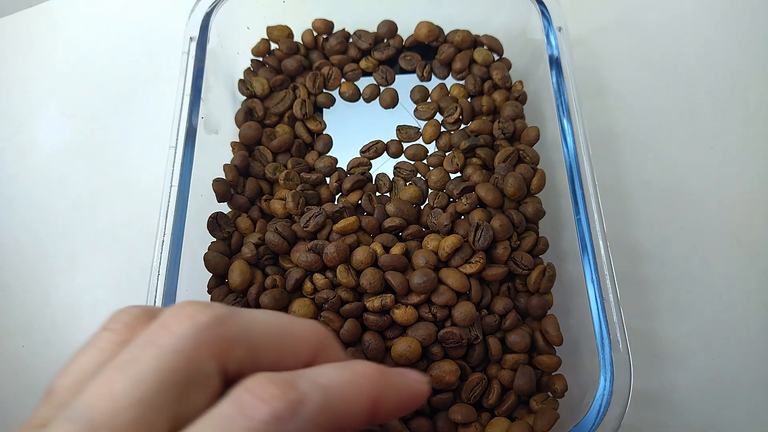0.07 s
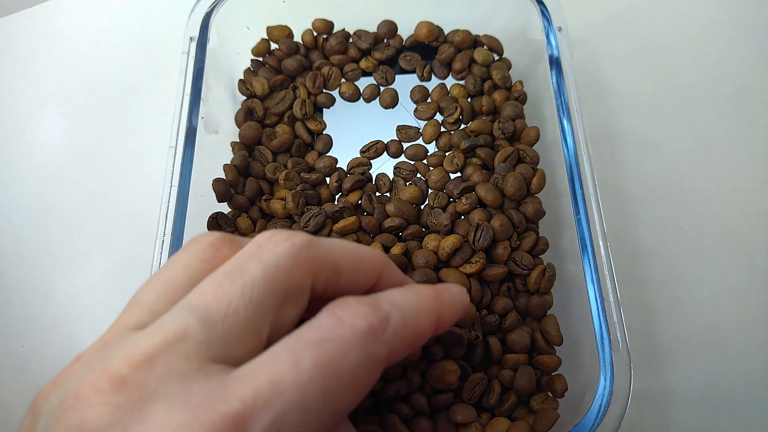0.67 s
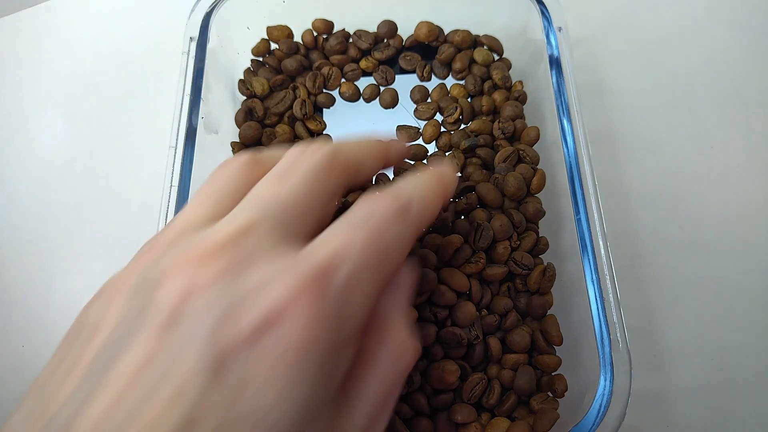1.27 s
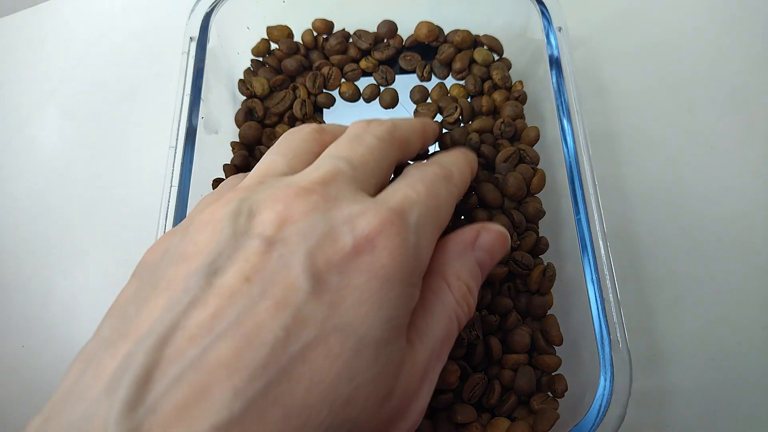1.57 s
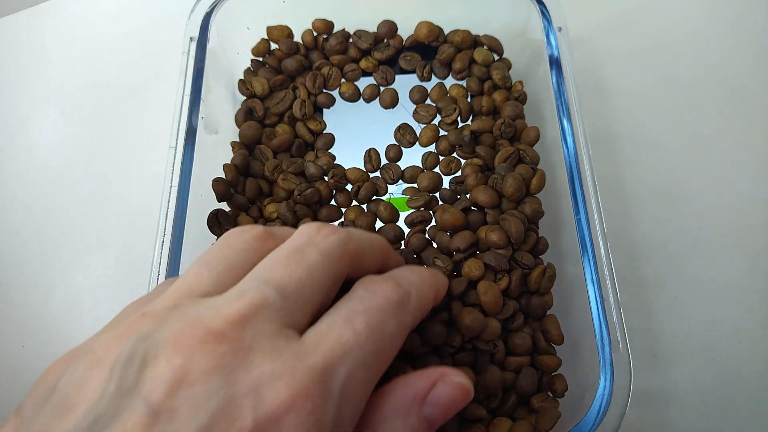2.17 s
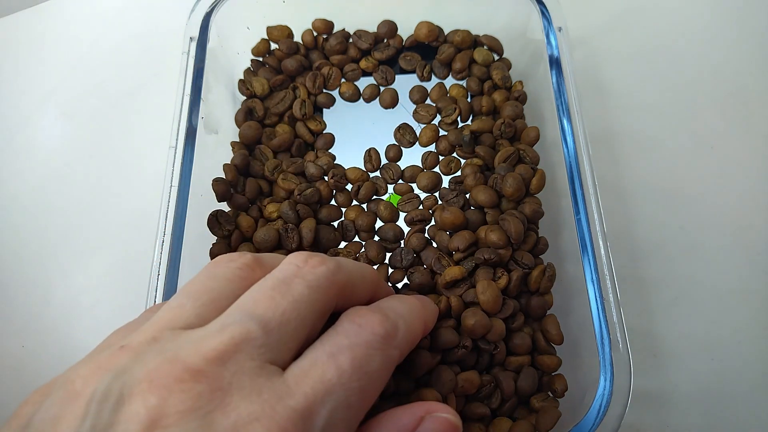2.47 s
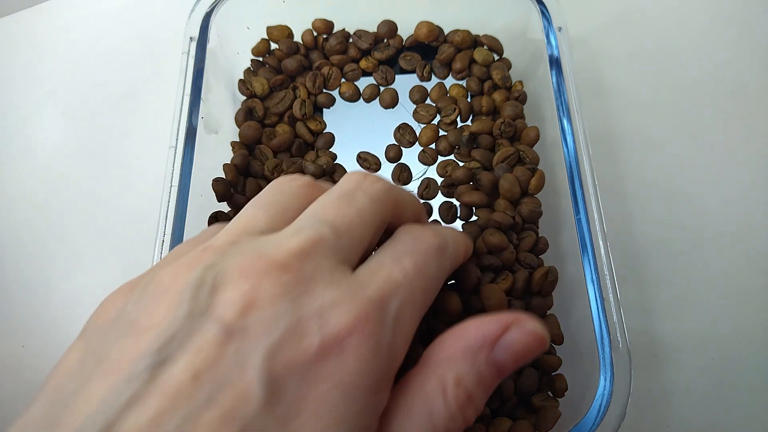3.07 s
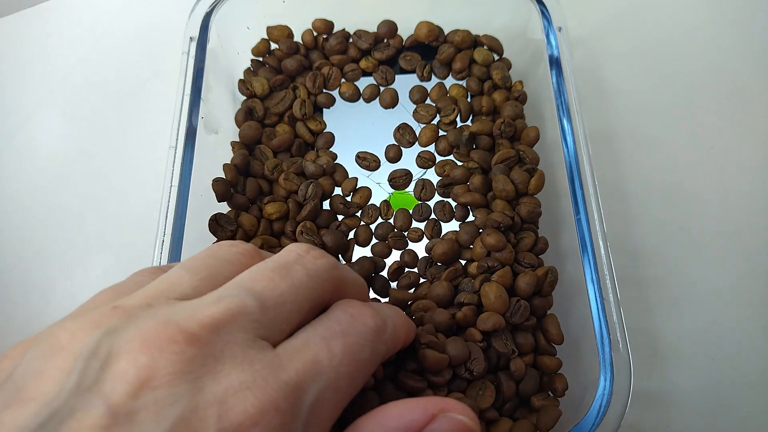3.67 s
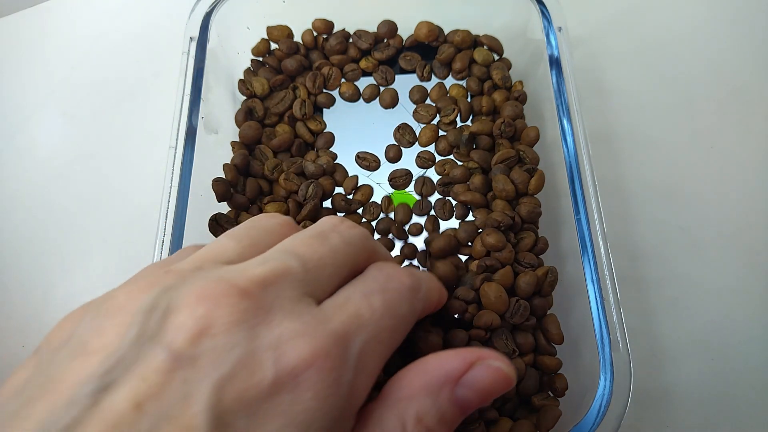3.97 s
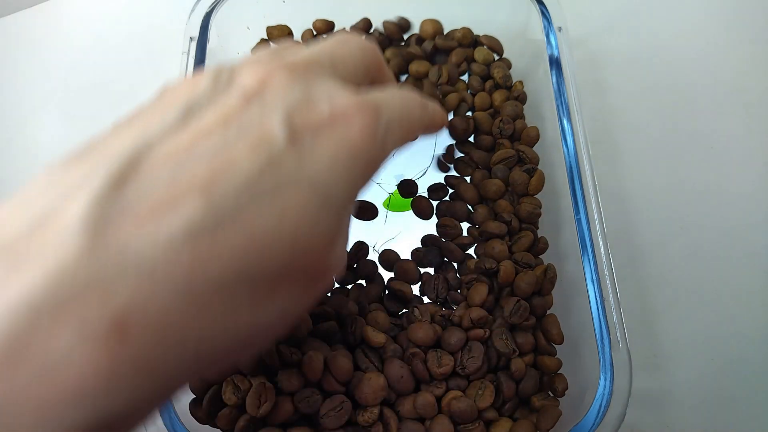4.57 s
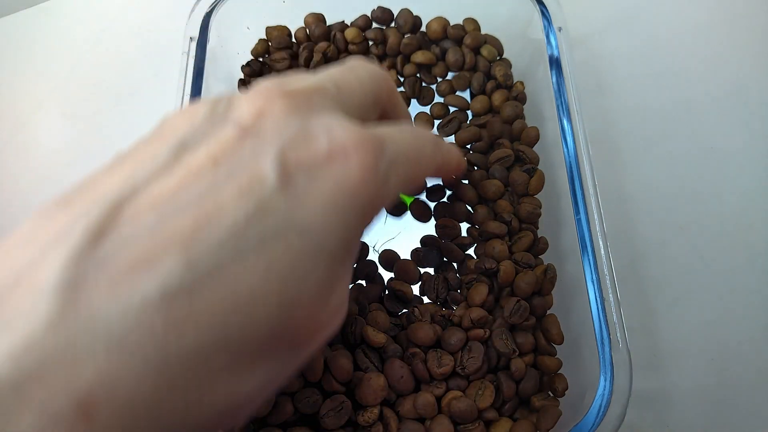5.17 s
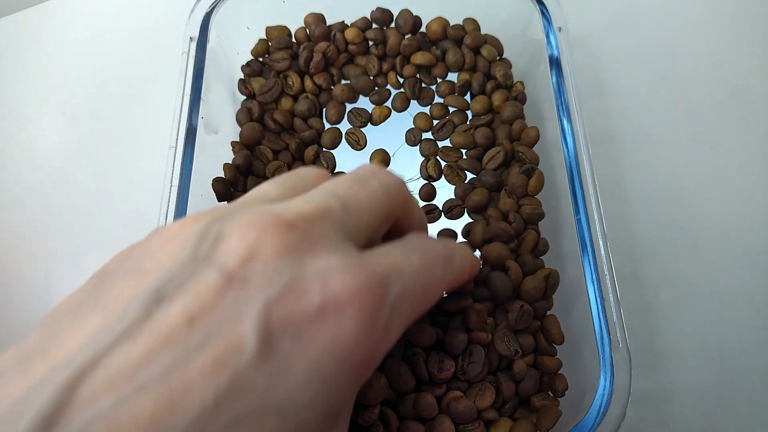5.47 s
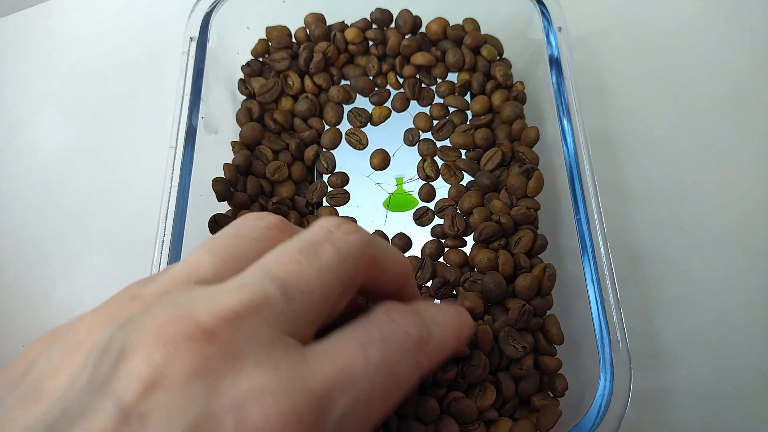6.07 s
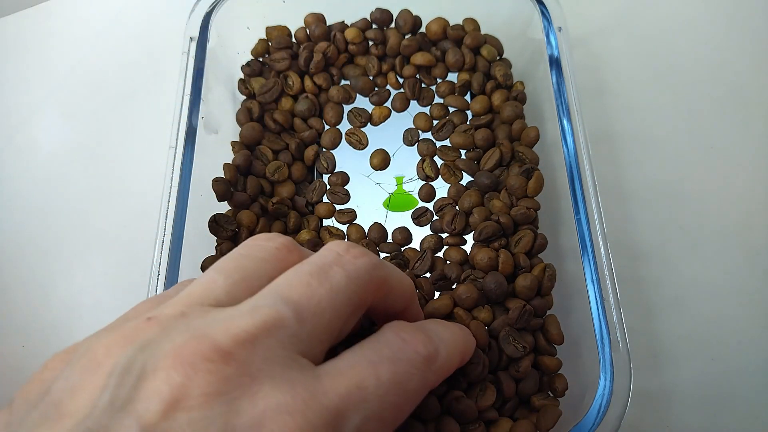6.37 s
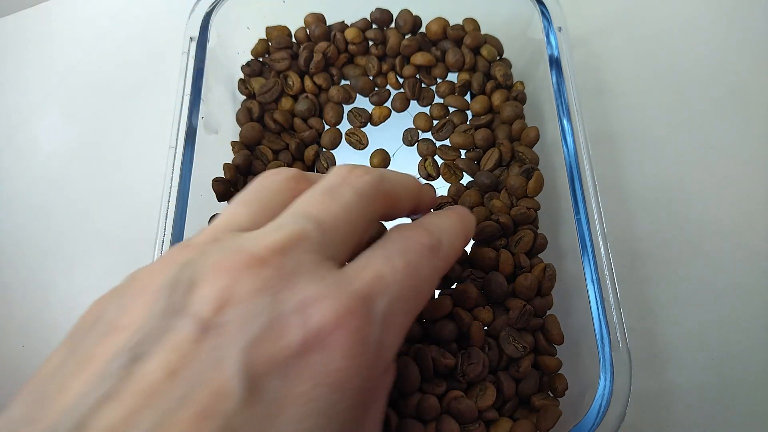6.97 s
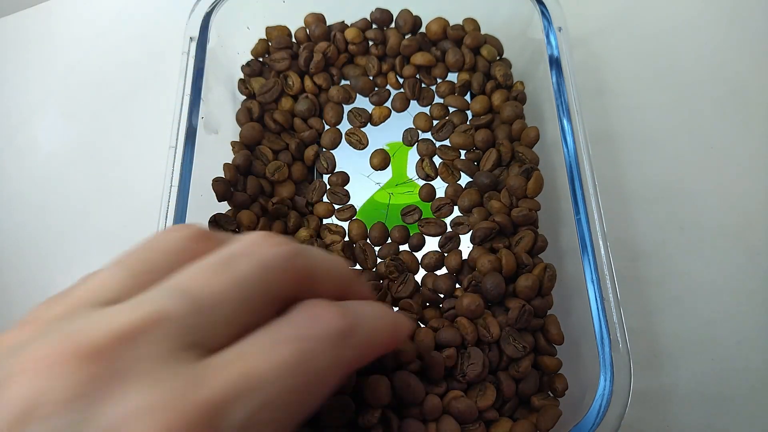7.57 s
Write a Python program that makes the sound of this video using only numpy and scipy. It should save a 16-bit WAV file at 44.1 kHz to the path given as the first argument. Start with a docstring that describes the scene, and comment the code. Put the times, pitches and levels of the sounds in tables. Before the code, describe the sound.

A hand stirs dry coffee beans in a shallow glass dish on a table, close by in a small room with a faint low hum. The first second is almost still, with only a light fingertip brush and a soft, dull bump. From about 1.4 seconds, the beans rustle and rattle in short, uneven pushes. Single beans knock and tick against the glass, husks give tiny crisp snaps, and the table rumbles faintly underneath. A stronger push comes near 2.8 seconds. The densest, loudest raking runs from about 3.7 to 5.3 seconds, with a sharp clack near 4.9. The movement then eases into lighter rustles and scattered clicks, falling nearly quiet around 6.5 seconds. A final push from about 6.9 to 7.5 seconds brings a bright clatter and brittle scraping. A few soft, dull taps follow just before 8 seconds.

```python
"""A small, faintly humming room, where a hand rakes dry roasted coffee beans back and forth in a shallow
glass dish on a table, close by. Countless small impacts add up to a gritty rustle, coloured by the
resonances of the glass, and friction on the bottom drives a rumble in the table. Single beans knock
and tick against the dish, brittle husks snap free, and fingertips brush the resting heap."""
import sys
import numpy as np
from scipy import signal
from scipy.fft import rfft, irfft
from scipy.io import wavfile
from scipy.ndimage import uniform_filter1d

SR = 44100
rng = np.random.default_rng(int(sys.argv[2]) if len(sys.argv) > 2 else 0)


def store_pcm(level_fs):
    """Save levels as 16-bit WAV."""
    pcm = np.round(np.clip(level_fs, -1, 1) * 32767).astype(np.int16)
    wavfile.write(sys.argv[1], SR, np.atleast_2d(pcm).T)


N = 344862
TAPS, LEAD = 2048, 128  # samples in an impulse response, and ahead of a contact's blow
TIME = np.arange(N) / SR
FREQS = np.arange(TAPS // 2 + 1) * SR / TAPS

# pushes of the fingers through the heap:
# (start [s], length [s], rustle level [dB], husk scrape over that level [dB], relative rumble [dB])
PUSHES = [(1.351, 0.12, -60, -3, -64), (1.448, 0.044, -53.5, 2.5, -57), (1.526, 0.036, -53, 2, -59),
          (1.563, 0.038, -51.5, 5, -53.5), (1.64, 0.23, -55.5, 1.5, -57), (1.808, 0.24, -54, -2, -53),
          (2.084, 0.14, -56.5, -1.5, -56.5), (2.378, 0.064, -52.5, 6, -56), (2.487, 0.1, -57, 3, -58.5),
          (2.716, 0.27, -47, 4, -54.5), (2.932, 0.22, -54, 1, -51.5), (3.11, 0.16, -55, 1.5, -55),
          (3.338, 0.032, -50.5, 0, -57), (3.439, 0.026, -51.5, 6, -52.5), (3.591, 0.04, -52.5, 2, -55.5),
          (3.743, 0.25, -48.5, 2.5, -53), (3.873, 0.11, -43.5, 1.5, -57), (4.026, 0.15, -46.5, 0.5, -54.5),
          (4.237, 0.15, -49, 1, -55), (4.353, 0.22, -47.5, 2.5, -54), (4.634, 0.14, -51, 3, -57),
          (4.805, 0.13, -47, 3.5, -56.5), (4.966, 0.17, -48.5, 2, -55), (5.161, 0.14, -49, 2.5, -57.5),
          (5.314, 0.21, -56.5, -1, -53.5), (5.75, 0.13, -57.5, 2, -58), (5.974, 0.14, -55, 1.5, -59),
          (6.194, 0.28, -72, -5, -67.5), (6.892, 0.19, -59, -5.5, -64.5), (7.033, 0.17, -53, -0.5, -59.5),
          (7.157, 0.23, -61, 7.5, -58.5)]


def undb(db):
    """Decibels to amplitude ratio."""
    return 10 ** (np.asarray(db) / 20)


def unit(x):
    """Normalisation to rms 1."""
    return x / np.sqrt(np.mean(x ** 2))


def fade(t, t60):
    """Exponential decay, 60 dB in t60 seconds."""
    return np.exp(-np.log(1000) * t / t60)


def contour(points):
    """Spectrum interpolated over log frequency from (frequency [Hz], level [dB]) points."""
    hz, db = np.transpose(points)
    return np.interp(np.log(FREQS + 1), np.log(hz), db)


def response(db):
    """Minimum-phase impulse response with the given gain at every frequency."""
    cepstrum = irfft(np.log(undb(db)))
    cepstrum[1:TAPS // 2] *= 2
    cepstrum[TAPS // 2 + 1:] = 0
    return irfft(np.exp(rfft(cepstrum)))


def convolve(x, h):
    """Convolution with an impulse response, cut to the input's length."""
    return signal.oaconvolve(np.atleast_2d(x), np.atleast_2d(h), axes=-1)[:, :np.shape(x)[-1]]


def band(x, hz, kind, order=3):
    """Maximally flat filter."""
    return signal.sosfilt(signal.butter(order, hz, kind, fs=SR, output="sos"), x)


def resonate(x, hz, width_hz):
    """Second-order resonance, gain 1 at its centre."""
    return signal.lfilter(*signal.iirpeak(min(hz, SR / 2 - 1000), hz / width_hz, fs=SR), x)


def wander(rate_hz):
    """Slow random modulation with a spread near 1."""
    knots = rng.standard_normal(int(N / SR * rate_hz) + 2)
    return np.interp(TIME * rate_hz, np.arange(len(knots)), knots)


def add(out, s, sound):
    """Superpose a contact so that its blow lands at time s."""
    start = max(int(s * SR) - LEAD, 0)
    out[:, start:start + TAPS] += sound[:, :N - start]


def blow_level(x, db):
    """Set the rms level of a blow over its first 6 ms."""
    return undb(db) * x / np.std(x[:, LEAD - 20:LEAD + 245])


def background(air_db=-66.0, side_db=-7, hum_hz=91.6, hum_db=-74.5, upper_hz=138.4):
    """Ambient noise, most coherent between the sides in the bass, and two phase-modulated hum tones."""
    # spectrum of the room's still air: (frequency [Hz], relative density [dB])
    air_spectrum = [(20, -43), (45, -16), (75, -12.5), (100, -1.5), (150, -2.5), (220, -7.5), (350, -7),
                    (520, -13), (1000, -18.5), (2300, -24), (4500, -29), (7500, -38), (11000, -36.5),
                    (12500, -32.5), (16000, -33.5)]
    # swells of the upper hum: (time [s], level [dB])
    upper_swells = [(.3, -79), (.45, -67.5), (.9, -75.5), (1.2, -74.5), (5.3, -73.5), (6.8, -79.5),
                    (7.7, -71.5)]
    mid, side = rng.standard_normal((2, N))
    side = undb(side_db) * side + .5 * band(side, 700, "high", order=1)
    air = unit(convolve(mid + side * np.array([[1], [-1]]), response(contour(air_spectrum))))
    tones = [(hum_hz, hum_db), (upper_hz, np.interp(TIME, *np.transpose(upper_swells)))]
    hum = sum(undb(db) * unit(np.sin(2 * np.pi * hz * TIME + 0.51 * wander(12))) for hz, db in tones)
    return undb(air_db) * air + hum


def contact(uneven_db, slip=0.27, scatter=.14, echo=0.58, echo_s=.0011):
    """Impulse response of one bean's impact: direct, reflected and scattered waves, and glass modes."""
    # broad spectrum of an impact: (frequency [Hz], relative level [dB])
    bean_spectrum = [(100, -50), (400, -24), (680, -18), (800, -7), (930, -2.5), (1100, 0), (1400, -1),
                     (1570, -3), (1850, -1.3), (3000, -3.5), (4600, -5.8), (5700, -8.3), (7200, -9),
                     (8300, -6), (9400, -4.3), (11200, -6.8), (12200, -3.2), (13700, -6.8), (15500, -7.3)]
    # modes of the dish: (frequency [Hz], bandwidth [Hz], gain over the broad spectrum [dB])
    glass_modes = [(1043, 50, 0.5), (1230, 34, -1), (1298, 27, 2), (1425, 110, 4.5), (1600, 120, -2),
                   (1728, 140, 4), (2420, 79, 3), (2830, 160, 2.5), (3130, 180, 0.5), (6580, 210, 3)]
    t = (np.arange(TAPS) - LEAD) / SR
    # rough shells grate for an instant before they catch; then the sound scatters among beans and walls
    grate = slip * np.exp(np.minimum(t, 0) / rng.uniform(.0003, .0014))
    paths = rng.standard_normal((2, TAPS)) * np.where(t < 0, grate, scatter * fade(np.abs(t), t60=.021))
    paths += band(paths[::-1] - paths, 2400, "low", order=1) / 2  # long waves reach both sides alike
    right_delay = rng.integers(3, 6)  # the left side is nearer
    bounce = int(SR * echo_s * rng.uniform(.7, 1.2))  # off the hand or the far wall
    for channel, lag in enumerate((LEAD, LEAD + right_delay)):
        paths[channel, lag] += 1
        paths[channel, lag + bounce + channel * rng.integers(0, 10)] += echo
    paths[1] -= 2 * resonate(paths[1], hz=1580, width_hz=400)  # bending mode: walls swing in antiphase
    glass_db = sum(db / (1 + (2 * (FREQS - hz) / width) ** 2) for hz, width, db in glass_modes)
    bumps = rng.standard_normal(26)  # every bean has its own broad resonances, mostly in the treble
    own_db = np.interp(FREQS, np.linspace(0, SR / 2, len(bumps)), bumps)
    own_db *= uneven_db * FREQS / (FREQS + 1200)
    colour = response(contour(bean_spectrum) + glass_db + own_db)
    pan_db = 2.0 + 1.3 * rng.standard_normal()
    return unit(convolve(paths, colour)) * undb([[pan_db / 2], [-pan_db / 2]])


def tick(blow, hz, width_hz):
    """Heavily damped resonance of one bean's shell, with little below its pitch."""
    return resonate(band(blow, 0.45 * hz, "high", order=5), hz, width_hz)


def snaps(ring_db=3, body_db=-21):
    """Sudden release: a husk snaps free, rings briefly at one pitch and barely stirs the dish."""
    # brittle husks slipping past each other: (time [s], level [dB], pitch [Hz], bandwidth [Hz])
    releases = [(0.619,-76,11000,5000), (1.436,-48.5,10700,2500), (1.487,-46,11700,3000),
                (1.764,-47,10200,1500), (1.795,-49,14500,3000), (1.978,-50,14500,4000),
                (2.061,-42,15150,2000), (2.102,-43,10500,4000), (2.111,-47,13000,9000),
                (2.399,-48,12300,3000), (2.406,-44,12300,3000), (2.42,-47,13000,4000),
                (2.515,-34,14900,2200), (2.736,-48,11200,3000), (2.866,-43,12800,1200),
                (2.917,-41,11900,3020), (2.935,-39,9800,1210), (3.136,-37,12500,1500),
                (3.144,-41,12600,1500), (3.179,-38.5,13050,1300), (3.458,-42,11750,2000),
                (3.475,-40,11900,3000), (3.644,-44.5,11700,3000), (4.121,-40.5,12500,1200),
                (4.331,-38,12700,2500), (4.426,-30,12800,3500), (4.428,-33,12700,1200),
                (4.531,-31.5,10100,4000), (4.531,-30.5,13600,4000), (5.871,-49,12500,4000),
                (5.939,-43.5,13500,6000), (5.952,-47.5,12500,4000), (6.079,-49,13500,3000),
                (6.094,-41,12600,2000), (6.993,-48,12000,1190), (7.064,-41,9400,3500),
                (7.249,-46,12500,3000), (7.254,-40,12500,3000), (7.324,-46,10000,2000),
                (7.362,-48,13800,5000), (7.393,-48,13000,1800), (7.406,-45,11400,3000),
                (7.413,-44.5,11900,3000), (7.45,-50,13400,5000), (7.456,-40,13100,2000),
                (7.653,-53.5,10200,5000)]
    out = np.zeros((2, N))
    for s, db, hz, width_hz in releases:
        blow = contact(uneven_db=3, slip=0, scatter=.22) * fade(TIME[:TAPS], t60=.08)
        shell = tick(blow, hz, width_hz)
        shell += undb(ring_db) * resonate(shell, hz, width_hz=450)
        body = band(blow, 7000, "low")
        add(out, s, blow_level(shell, db) + blow_level(body, db + body_db))
    return out


def brushes(hz=8850, width_hz=1300):
    """Friction noise: a fingertip slides over resting beans with a faint, narrow-band hiss."""
    # light strokes: (start [s], length [s], highest level [dB])
    strokes = [(0.825, 0.12, -75), (6.729, 0.11, -76)]
    gain = sum(undb(db) * np.interp(TIME, [s, s + length / 4, s + length], [0, 1, 0])
               for s, length, db in strokes)
    hiss = resonate(rng.standard_normal((2, N)), hz, width_hz)
    return gain * unit(resonate(hiss, hz, width_hz))


def tocks(rise_cycles=2.1):
    """Damped sinusoids with a rounded onset: dull blips that last longer the lower they are."""
    # soft tocks as the hand arrives and leaves: (time [s], pitch [Hz], peak level [dB])
    blips = [(1.161, 185, -58.5), (7.611, 810, -63.5), (7.723, 850, -54), (7.787, 930, -58)]
    out = np.zeros(N)
    for s, hz, db in blips:
        cycles = hz * np.maximum(TIME - s, 0)
        envelope = cycles / rise_cycles * np.exp(1 - cycles / rise_cycles)
        out += undb(db) * envelope * np.sin(2 * np.pi * cycles)
    return out


def push_envelope(levels_db, attack_s, t60, sag_db_per_s=2):
    """Envelope in dB: each push builds, sags as the beans make way, then decays; the strongest leads."""
    gain = np.full(N, 1e-6)
    for (start, length, *_), db in zip(PUSHES, levels_db):
        span = slice(int(start * SR), int(start * SR) + SR)
        t = TIME[span] - TIME[span][0]
        rise = np.minimum(t / attack_s, 1)
        held = undb(db - sag_db_per_s * np.minimum(t, length))
        settle = fade(np.maximum(t - length, 0), t60)
        gain[span] = np.maximum(gain[span], rise * held * settle)
    return 20 * np.log10(gain)


def jostle(rate, busy, spread_db, uneven_db, spot_count=120):
    """Shot noise: random impacts at many spots; busy (0-1), the share of moving beans, sets the density."""
    spots = [contact(uneven_db) for _ in range(spot_count)]
    chances = rng.random((int(rate * N / SR), 3))
    forces = undb(spread_db * np.minimum(rng.standard_normal(len(chances)), 1.6))
    out = np.zeros((2, N))
    for (when, threshold, spot), force in zip(chances, forces):
        share = busy[int(when * N)]
        if threshold < share:
            add(out, when * N / SR, force / np.sqrt(share) * spots[int(spot * spot_count)])
    return unit(out)


def squeaks(count=450):
    """Stick-slip friction: shells catch on the glass in tiny scratches, each at its own pitch."""
    out = np.zeros((2, N))
    t = TIME[:TAPS]
    envelope = (1 - np.exp(-t / .0004)) * fade(t, t60=.014)
    for when, pitch, force in rng.random((count, 3)):
        scratch = resonate(rng.standard_normal((2, TAPS)), hz=9000 + 5000 * pitch, width_hz=1000)
        add(out, when * N / SR, force * envelope * scratch)
    return unit(out)


def rustle(reach, hollow_near_db=-8, hollow_far_db=-0.5, grit_far_db=-0.5):
    """Incoherent sum of impacts that ring the dish, grate and scrape; a harder push moves more beans."""
    # fine, then coarse contacts:
    # (rate in a firm push [1/s], spread of force [dB], spread of colour [dB], weight [dB])
    kinds = [(3000, 4, 3, -1.8), (300, 3.6, 5, 0)]
    _, _, levels, scrapes, _ = np.transpose(PUSHES)
    push_db = push_envelope(levels, attack_s=0.015, t60=0.36)
    husk_db = push_envelope(levels + scrapes, attack_s=0.015, t60=0.34)
    # at the thinly covered far end the dish rings more and fewer beans rub each other
    hollow_db = push_db + hollow_near_db + reach * (hollow_far_db - hollow_near_db)
    grit_db = push_db + grit_far_db * reach ** 2
    busy = undb((np.clip(grit_db, -62, -44) + 44) / 2)
    grains = sum(undb(db) * jostle(rate, busy, spread, uneven) for rate, spread, uneven, db in kinds)
    hollow = unit(band(grains, 1470, "low", order=5)) * undb(hollow_db)
    grit = unit(band(grains, [1600, 7500], "band", order=5)) * undb(grit_db)
    husks = unit(band(grains, 7900, "high", order=5)) + undb(-9) * squeaks()
    surge = undb(1.1 * wander(40) - .1)  # the heap jams and gives way many times a second
    return surge * (hollow + grit + unit(husks) * undb(husk_db))


def rumble(reach, side_gain=0.66, trim_db=-4.5):
    """Forced vibration: dragged beans shake dish and table; pulls favour upper modes, pushes lower ones."""
    # modes of the loaded dish on the table:
    # (frequency [Hz], bandwidth [Hz], gain [dB], gain added on a pull and lost on a push [dB])
    table_modes = [(223.8, 13.6, 12.5, -0.8), (273, 30, 1, -1), (324.7, 17, 9, 1), (347, 9.9, 2, 1),
                   (430, 1200, -14, 0.5)]
    *_, levels = np.transpose(PUSHES)
    rumble_db = push_envelope(levels, attack_s=0.013, t60=0.73)
    drag = rng.standard_normal(N) + side_gain * rng.standard_normal((2, N))
    pull = uniform_filter1d(-np.sign(np.gradient(reach)), size=SR // 8)  # +1 towards the near end
    shake = sum(undb(db + pull_db * pull) * resonate(drag, hz, width)
                for hz, width, db, pull_db in table_modes)
    return unit(shake) * undb(rumble_db + trim_db)


def clacks(reach, heap_edge_hz=2900, bare_edge_hz=1550, knock_trim_db=-4, crack_trim_db=-5,
           tick_trim_db=-1.5):
    """Impact excitation: a bean knocks the dish, lower on bare glass; its shell cracks, clinks and ticks."""
    # beans striking the glass, levels before trim: (time [s], knock [dB], crack [dB], tick [dB])
    impacts = [(1.366, -60, -57, -58), (1.382, -54, -66, -71), (1.464, -59, -50, -48),
               (1.471, -67, -53, -45), (1.508, -52, -45, -46), (1.585, -49, -46, -44),
               (1.59, -40, -43, -47), (1.675, -50, -45, -47), (1.681, -49, -48, -53),
               (1.747, -47, -47, -53), (1.809, -52, -39, -51), (1.85, -43, -40.5, -48),
               (1.886, -44.5, -40.5, -44.5), (1.921, -49, -45, -54), (1.931, -51, -45, -54),
               (1.988, -40.5, -40.5, -42.5), (2.03, -49, -48, -42.5), (2.136, -44.5, -40.5, -43.5),
               (2.161, -52, -51, -40.5), (2.204, -44.5, -43, -42), (2.22, -53, -56, -46),
               (2.227, -62, -52, -48), (2.391, -57, -51, -59), (2.44, -46.5, -62, -55),
               (2.453, -52, -49, -53), (2.485, -49, -61, -47), (2.49, -43, -44, -48),
               (2.58, -36, -37.5, -39), (2.593, -49, -42.5, -57), (2.679, -46, -56, -52),
               (2.8, -38.5, -34.5, -40), (2.811, -42, -38, -40), (2.914, -41, -46, -46),
               (2.972, -44, -50, -55), (2.987, -43, -50, -39), (3.136, -41, -40, -54),
               (3.175, -44, -47, -52), (3.253, -62, -67, -66), (3.286, -49, -57, -48.5),
               (3.335, -50, -52, -43), (3.352, -50, -42, -49), (3.372, -53, -43, -47),
               (3.39, -42.5, -43, -53), (3.464, -42, -39, -41), (3.497, -39.5, -43.5, -51.5),
               (3.584, -43.5, -45.5, -57), (3.61, -43, -37.5, -46), (3.66, -46.5, -66, -65),
               (3.746, -53, -65, -56), (3.767, -61, -63, -46), (3.808, -49, -48, -46),
               (3.885, -56, -58, -49), (3.912, -50, -47, -46), (3.948, -37, -37.5, -42),
               (3.952, -47, -37, -42), (4.058, -35.5, -37.5, -50), (4.088, -39.5, -45, -43),
               (4.138, -43, -51, -57), (4.147, -40, -50, -37.5), (4.196, -42.5, -42, -43),
               (4.257, -47, -53, -48), (4.269, -48, -43, -55), (4.378, -43, -38.5, -39),
               (4.407, -42, -43, -45), (4.427, -36, -51, -50), (4.45, -42, -52, -39),
               (4.461, -39, -47, -41), (4.474, -51.5, -46.5, -38), (4.487, -35.5, -43, -52),
               (4.513, -42, -57, -52), (4.531, -39, -54, -43), (4.544, -37.5, -58, -47),
               (4.561, -39, -58, -41), (4.583, -39, -59, -58), (4.649, -38, -40, -39),
               (4.653, -43, -38, -38), (4.669, -40, -40.5, -44), (4.821, -46, -41, -41.5),
               (4.845, -65, -54, -44), (4.867, -47, -48, -48), (4.873, -42, -50, -44),
               (4.877, -28.5, -33.5, -36), (4.897, -61, -44, -58), (4.902, -48, -47, -54),
               (4.919, -46, -49, -58), (4.924, -39, -39.5, -58), (4.945, -57.0, -57.5, -44),
               (4.972, -40.5, -38, -50), (5.014, -47, -39.5, -50), (5.065, -47, -59, -45),
               (5.197, -45, -48, -42), (5.212, -58, -47, -49), (5.272, -51, -50, -46),
               (5.314, -50, -59, -53), (5.427, -48, -49, -54), (5.447, -45, -48, -47),
               (5.471, -47, -51, -49), (5.511, -44, -44, -41.5), (5.53, -48, -48, -45),
               (5.541, -44, -44, -39.5), (5.715, -64, -63, -61), (5.767, -61, -65, -66),
               (5.801, -47.5, -48, -55), (5.832, -42.5, -46, -66), (5.997, -67, -51, -46),
               (6.079, -47, -62, -57), (6.093, -46, -48, -48), (6.099, -55, -53, -45),
               (6.105, -42, -44, -36), (6.173, -52.5, -55, -62), (6.325, -53, -56, -51.5),
               (6.371, -59, -62, -59), (6.374, -47.5, -48, -49), (6.394, -47, -42, -51),
               (6.409, -48, -49, -48), (6.442, -49, -51.5, -52.5), (6.932, -55, -69, -73.5),
               (7.12, -33.5, -38, -35), (7.143, -39, -45, -37), (7.158, -48, -52, -43),
               (7.195, -48, -56, -55), (7.301, -49, -46, -57), (7.585, -74, -67, -66)]
    # modes of the bottom: (frequency [Hz], bandwidth [Hz], gain when bare [dB], gain under the heap [dB])
    bottom_modes = [(1080, 550, -1, -13), (1058, 60, 2, -12), (1298, 60, 10.5, -11.5), (1808, 65, -13, 2),
                    (1920, 160, -7.5, 6.5)]
    out = np.zeros((2, N))
    for s, knock_db, crack_db, tick_db in impacts:
        blow = contact(uneven_db=2.0, slip=0)
        tick_hz, clink_hz = 9270 * rng.uniform(.93, 1.27), rng.uniform(3000, 6800)
        bare = reach[int(s * SR)] ** 2
        knock = band(blow, heap_edge_hz + bare * (bare_edge_hz - heap_edge_hz), "low")
        knock += sum(undb(heap_db + bare * (bare_db - heap_db)) * resonate(knock, hz, width)
                     for hz, width, bare_db, heap_db in bottom_modes)
        crack = band(blow, [3000, 7600], "band")
        crack += undb(1) * resonate(crack, clink_hz, width_hz=700)
        add(out, s, blow_level(knock, knock_db + knock_trim_db))
        add(out, s, blow_level(crack, crack_db + crack_trim_db))
        add(out, s, blow_level(tick(blow, tick_hz, width_hz=7000), tick_db + tick_trim_db))
    return out


def room(x, t60_low=0.1, t60_high=0.065, wet_db=-11):
    """Reverberation of a small furnished room: a short diffuse tail that decays faster in the treble."""
    t = TIME[:SR // 2]
    noise = rng.standard_normal((2, len(t)))
    low = band(noise, 1800, "low", order=1)
    onset = 1 - np.exp(-(t / .004) ** 2)
    tail = onset * (low * fade(t, t60_low) + (noise - low) * fade(t, t60_high))
    return x + undb(wet_db) * convolve(x, unit(tail) / np.sqrt(len(t)))


def scene():
    """Superposition of the beans with their reverberation, the table's rumble and the room's air and hum."""
    # path of the hand: (time [s], reach [0 = deep heap at the near end, 1 = thinly covered far end])
    hand_path = [(1.4, 0.95), (2.2, 0.1), (2.55, 0.55), (2.8, 0.75), (3.1, 0.6), (3.4, 0.11), (4.0, 0.57),
                 (4.53, 1), (5.0, 0.85), (5.4, 0.19), (6.1, 0.48), (7.0, 0.64), (7.4, 0.19)]
    reach = np.interp(TIME, *np.transpose(hand_path))
    beans = rustle(reach) + clacks(reach) + snaps() + brushes() + tocks()
    return room(beans) + rumble(reach) + background()


def record(dry):
    """Band limiting: the microphone drops the deepest bass, and a steep low-pass cuts the very top."""
    bass_hz, top_hz = 28, 15850
    thin = band(dry, bass_hz, "high", order=2)
    return signal.sosfilt(signal.ellip(10, .2, 70, top_hz, fs=SR, output="sos"), thin)


dry = scene()
out = record(dry)
store_pcm(out)
```